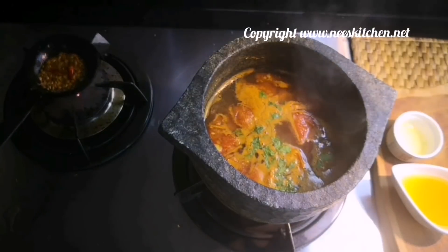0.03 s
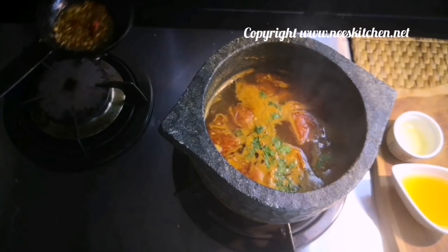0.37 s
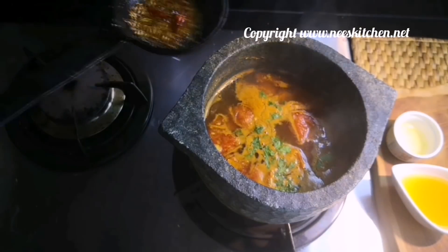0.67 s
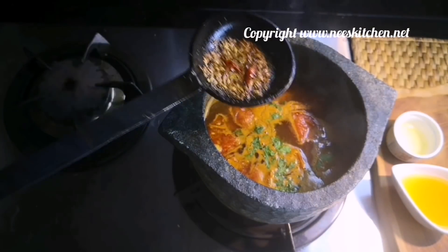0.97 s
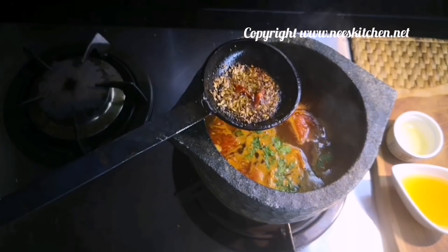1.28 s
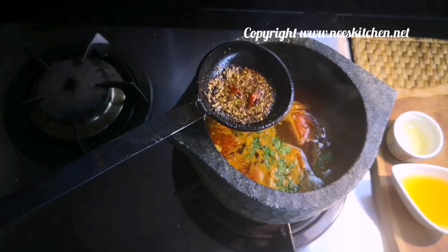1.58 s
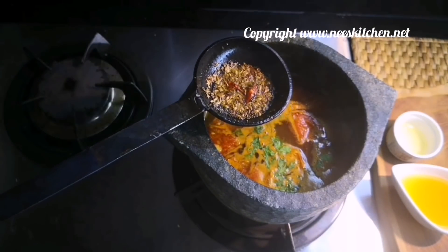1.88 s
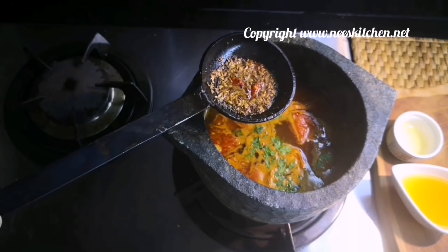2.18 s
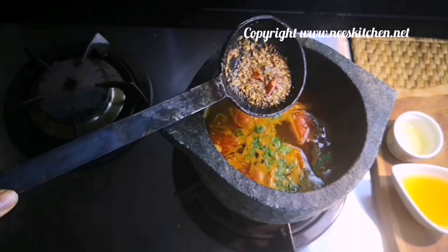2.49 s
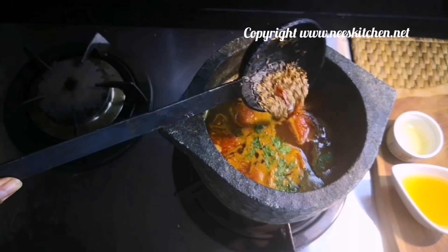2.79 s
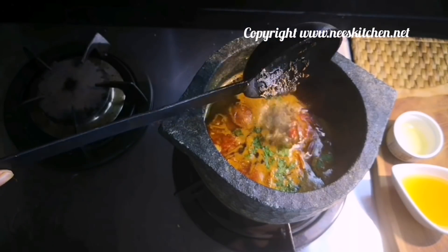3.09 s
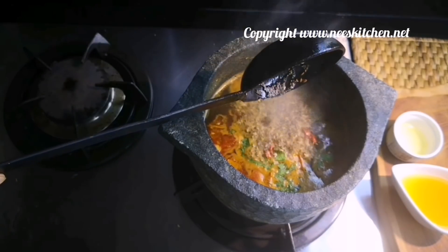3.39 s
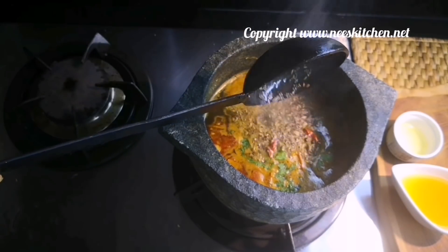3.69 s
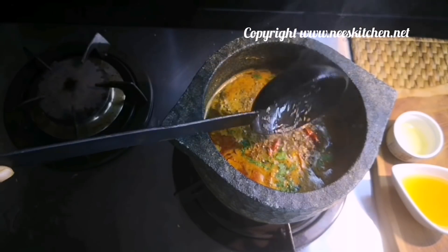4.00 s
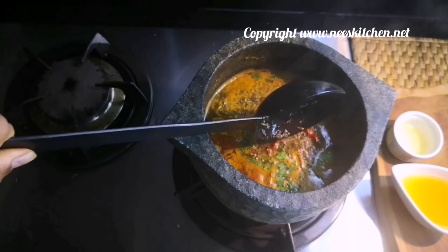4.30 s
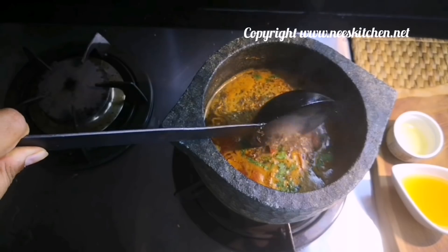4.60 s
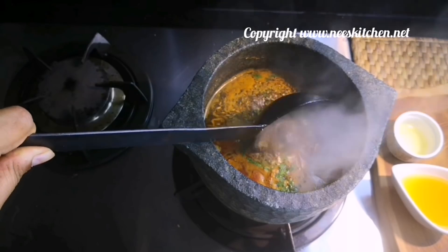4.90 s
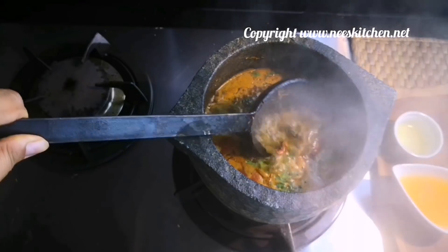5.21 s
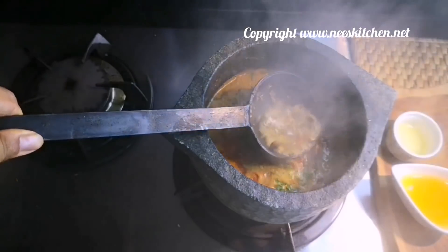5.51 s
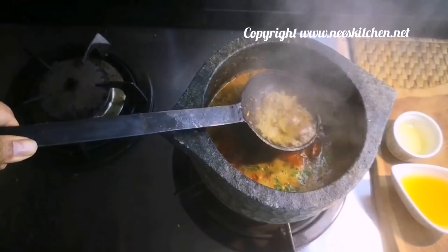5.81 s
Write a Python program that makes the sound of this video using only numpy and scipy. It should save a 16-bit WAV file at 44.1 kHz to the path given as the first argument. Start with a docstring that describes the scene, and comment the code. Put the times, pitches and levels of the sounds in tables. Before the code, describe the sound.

A gas burner rushes softly in a home kitchen while mustard seeds pop and fat spits in a ladle of hot ghee. The ghee is tipped into a pot of broth with a sudden crackling sizzle that dies toward a simmer. Then the hot ladle is dipped in and the sizzle returns louder, seething steadily over low bubbling. The stereo microphones are close to the stove.

```python
"""Mustard seeds pop in an iron ladle of hot ghee over a gas flame's rush and a faint hum: a home kitchen,
a stereo pair of microphones close to the hob. The ladle is carried over a stone pot of broth and tipped;
water flashes to steam in the fat, a sizzle that dies to a simmer. Then the hot iron is dipped in, boils
the broth much harder, and comes up full and seething. The air in pot and ladle colours the tiny bursts,
steam pockets thump underneath, and rising air rumbles on the microphones."""
import sys
import numpy as np
from scipy import signal
from scipy.fft import rfft, irfft
from scipy.io import wavfile

SR = 44100
rng = np.random.default_rng(int(sys.argv[2]) if len(sys.argv) > 2 else 0)


def digitize_waveform(pressure):
    """Quantize a signal to 16-bit integers and store it at the path in sys.argv[1].

    Rows of a 2-D input are taken as channels; values are limited to [-1, 1].
    """
    field = np.atleast_2d(pressure).T
    bounded = np.clip(field, -1, 1)
    quanta = np.round(bounded * 32767).astype(np.int16)
    wavfile.write(sys.argv[1], SR, quanta)


N = 266789
TIME = np.arange(N) / SR
FREQ = np.maximum(np.arange(N // 2 + 1) * SR / N, 1)
POUR_S, DIP_S, LIFT_S = 2.83, 4.36, 5.27  # ghee tipped in, ladle dipped, ladle halfway out
POT_PAN_DB = -1.16  # every pan is left minus right

# Spectrum of the gas flame: f/Hz, level/dB
FLAME_COLOUR = [(41, -19), (70, 0.5), (181, 5.5), (232, -7.5), (381, -4.5), (613, -13.5), (1030, -9),
                (1480, -12.5), (2600, -12.5), (3330, -20.5), (4580, -20), (6420, -24.5), (7190, -18),
                (8610, -36.5), (15500, -33)]
# Lines of the kitchen's hum: f/Hz, level/dB
HUM_LINES = [(96.9, -71.5), (166.9, -70), (285.3, -69), (403.7, -69)]
# Side relative to mid at the microphones, for flame and heaving, then for the sizzle: f/Hz, level/dB
HOB_WIDTH = [(60, -26), (110, -42), (200, -16.5), (380, -1), (700, 6), (1290, -1.5), (2380, 0),
             (4400, -1.5), (8120, 0.5), (15000, 0)]
SIZZLE_WIDTH = [(60, -64), (110, -120), (200, -77), (380, 0), (700, 1.5), (1290, -11.5), (2380, -2.5),
                (4400, -4.5), (8120, 0.5), (15000, 0)]
# Spectrum of the low boiling: f/Hz, level/dB
LOW_BOIL_COLOUR = [(29, -27), (50, 8), (140, -16), (167, -8), (204, 7), (284, -22), (329, -13), (403, -61),
                   (450, -4.5), (580, -20), (990, -120)]
# Low resonances of pot and room: f/Hz, width/Hz, level/dB
POT_ROOM_MODES = [(94, 3.3, 8.5), (137.5, 18.7, 3), (202, 41, -5.5), (334, 17, -7)]
# The broth heaves as the ghee lands and as the ladle is drawn up: t/s, half length/s, gain/dB
BROTH_HEAVES = [(3.08, 0.078, 7), (5.17, 0.11, 4.5)]
# Steam squeezing out of the fat: t/s, f/Hz, level/dB, half length/s, pan/dB
STEAM_WHISTLES = [(2.902, 3600, -27, 0.0043, -3), (3.004, 7100, -29, 0.0057, 7),
                  (3.717, 7460, -30, 0.018, -11), (3.745, 7360, -32, 0.0066, -8),
                  (4.662, 4900, -28, 0.013, 1)]
# Spectrum of a pop's broad snap: f/Hz, level/dB
SNAP_SPECTRUM = [(500, 17), (1000, 0), (1700, 6), (4000, 7.5), (7500, 14), (9500, -0.5), (14500, 3.5)]
# Moisture spitting out of the fat: t/s, level/dB, snap trim/dB, pan/dB
FAT_SPITS = [(0.505, -19, 8, 1.5), (0.549, -38, 12, -4), (0.696, -34, -1, 4), (0.976, -27, -4, -1),
             (1.9, -14.5, -1, -2), (1.947, -22.5, -4, -7), (1.971, -17, 12, 0), (2.174, -20, -7, 0),
             (2.822, -17.5, -36, 0), (3.831, -39, -25, 2), (4.008, -13, 5, -3), (4.163, -15.5, 10, -11),
             (4.904, -19, -31, 7), (5.028, -7.5, -16, 20), (5.146, -10, 19, -1)]
# Mustard seeds bursting: t/s, level/dB, husk ring f/Hz, bowl ring trim/dB, snap trim/dB
SEED_POPS = [(0.127, -41, 2230, -10, -45), (0.43, -27, 2030, -5, -42), (0.864, -37, 2030, -10, -36),
             (1.078, -14, 2780, 2.5, -35), (1.276, -26, 1600, -16, -46), (1.867, -24, 2730, 4, -35),
             (1.963, -10, 3000, -4.5, -29), (2.016, -17, 2960, -5.5, -35), (2.067, -25.5, 2620, 0, -27),
             (2.25, -31.5, 2500, -2, -29), (2.281, -21, 2820, -26, -41), (2.352, -8, 2850, 0.5, -27.5),
             (2.365, -16.5, 2510, -4, -25), (2.401, -11.5, 2760, -8, -27), (2.625, -18, 2900, -12, -27.5),
             (4.003, -17, 2740, -7, -18), (4.16, -18, 2540, -15, -19)]
# Broad spectra of the sizzle, for the pour and for the dip: f/Hz, level/dB
POUR_SPECTRUM = [(180, -46), (300, -24.5), (543, -21), (968, -7), (1330, -7.5), (1840, -5.5), (3130, -15),
                 (3570, -1.5), (4140, -4), (5660, -9.5), (7370, -14), (9450, -28.5), (15500, -25)]
DIP_SPECTRUM = [(180, -48), (300, -16), (543, -22), (708, -4), (863, -4), (1000, 0.5), (1350, -3),
                (1640, 4), (2250, -2), (2650, -2.5), (6150, -4.5), (7250, 4.5), (9450, -14.5),
                (14500, -6.5), (15500, -9)]
# Air resonances of the pot: open, ladle sunk in it, ladle lifted: f/Hz, width/Hz, level/dB
OPEN_POT_MODES = [(744, 43, -5.5), (1007, 66, 0.5), (1656, 66, 0), (1815, 31, 3), (2150, 93, -5),
                  (2830, 300, -6), (3574, 160, 5), (4470, 43, -10), (4840, 80, 1.5), (7380, 520, -4.5)]
SUNK_MODES = [(1013, 41, 2.5), (1640, 310, -14), (2730, 150, -8), (3000, 34, -15), (3230, 56, -3),
              (3940, 64, 0.5), (4640, 340, -1.5), (5400, 130, -5), (7400, 180, -5.5), (8300, 76, -3)]
LIFTED_MODES = [(779, 16, 5.5), (1030, 83, 4), (1660, 64, -21), (1900, 74, -7), (2120, 6.2, 2),
                (2596, 50, 3.5), (3590, 560, -2), (4700, 76, 2.5), (5050, 40, 6), (5800, 29, 4),
                (7780, 330, 0.5)]
# The first gush and last dribbles of ghee flare the sizzle: t/s, half length/s, gain/dB
GHEE_GUSHES = [(2.885, 0.0083, 4.5), (3.73, 0.0099, 2), (4.27, 0.048, 4)]


def undb(db):
    """Decibels to gain."""
    return 10 ** (np.asarray(db) / 20)


def unit(x):
    """Scale to rms 1."""
    return x / np.sqrt(np.mean(x ** 2))


def mid_unit(pair):
    """Scale a stereo pair so that its middle has rms 1."""
    return pair / np.std(pair.mean(axis=0))


def bins(length):
    """Frequencies in Hz of a spectrum of this many samples, floored at 1."""
    return np.maximum(np.fft.rfftfreq(length, 1 / SR), 1)


def shape(points, freq=FREQ):
    """Gain at each frequency of a spectrum given as f/Hz, level/dB."""
    hz, db = np.transpose(points)
    return undb(np.interp(np.log(freq), np.log(hz), db))


def peak(hz, width_hz):
    """Gain of one narrow resonance."""
    return 1 / (1 + ((FREQ - hz) / width_hz) ** 2)


def filtered(x, gain):
    """Apply a gain per frequency."""
    return irfft(rfft(x) * gain, N)


def causal(gain):
    """Impulse response with this gain that starts at once and rings out."""
    cepstrum = irfft(np.log(gain + 1e-9))
    half = len(cepstrum) // 2
    cepstrum[1:half] *= 2
    cepstrum[half + 1:] = 0
    return irfft(np.exp(rfft(cepstrum)))


def panned(db):
    """Left and right gains for a level difference between the microphones."""
    return undb(np.array([db, -db]).reshape(2, -1) / 2)


def spread(pair, width):
    """Two unrelated signals become mid and side, then left and right."""
    side = filtered(pair[1], shape(width))
    return np.array([pair[0] + side, pair[0] - side])


def ramp(middle_s, length_s):
    """Rises from 0 to 1 around a moment."""
    return np.clip((TIME - middle_s) / length_s + .5, 0, 1)


def swells(rows):
    """Sum of Gaussian bumps in dB, each t/s, half length/s, gain/dB."""
    return sum(db * np.exp(-((TIME - s) / half_s) ** 2 / 2) for s, half_s, db in rows)


def walk(per_s):
    """Random wander about zero, gliding to a new value per_s times a second."""
    knots = rng.standard_normal(N // 50)
    return 0.9 * np.interp(TIME * per_s, np.arange(len(knots)), knots)


def bursts(per_s, scatter_db):
    """Bubbles bursting at random: mostly tiny, a few large."""
    size = undb(scatter_db * np.minimum(rng.exponential(size=(2, N)), 3.5))
    bursting = rng.random((2, N)) < per_s / SR
    return unit(bursting * size * rng.choice([-1, 1], (2, N)))


def cavity(colour, modes, bed_db, ring_db, blur=0.018):
    """Gain of a broad bed with the vessel's resonances standing out; the heaving surface blurs them."""
    ring_power = 0
    for hz, width_hz, db in modes:
        blurred_hz = np.hypot(width_hz, blur * hz)
        ring_power += undb(db) ** 2 * width_hz / blurred_hz * peak(hz, blurred_hz) ** 2
    return np.hypot(undb(bed_db) * shape(colour), undb(ring_db) * np.sqrt(ring_power))


def reflections(ripple_db=3, step_hz=70):
    """Echoes from hob and walls comb the spectrum into fine peaks and dips."""
    knots = rng.standard_normal(N // 100)
    ripple = np.interp(FREQ / step_hz, np.arange(len(knots)), knots)
    return undb(ripple_db * ripple * np.minimum(FREQ / 3000, 1))


def kitchen(early_db, late_db, early_s=0.0054, t60_s=0.24):
    """Path to the microphones: direct sound, quick scatter from pot and hob, then the room's tail."""
    t = TIME[:SR // 2]
    early = rng.standard_normal((2, len(t))) * np.exp(-t / early_s)
    late = rng.standard_normal((2, len(t))) * undb(-60 * t / t60_s) * (1 - np.exp(-t / 0.0021))
    late = irfft(rfft(late) * shape([(2500, 0), (12000, -1)], bins(len(t))), len(t))
    response = (undb(early_db) * unit(early) + undb(late_db) * unit(late)) / np.sqrt(len(t))
    response[:, 0] += 1
    return response


def draught(level_db=-59, rise_db_per_s=2, gust_db=3.8):
    """Rising air rumbles on the microphones in gusts, more and more as the pot steams."""
    colour = shape([(5, -37), (18, 4), (35, 5.5), (60, -5.5), (110, -9), (600, -108)])
    rumble = filtered(rng.standard_normal(N), colour)
    return unit(rumble) * undb(level_db + rise_db_per_s * TIME + gust_db * walk(5.6))


def hum(width_hz=6, gain_db=3, sink_db=-9):
    """Narrow resonances stirred by the flame and the air: a faint wavering hum that soon sinks."""
    stir = rng.standard_normal(N)
    lines = sum(undb(db) * unit(filtered(stir, peak(hz, width_hz))) for hz, db in HUM_LINES)
    return lines * undb(gain_db + sink_db * ramp(1.4, length_s=0.26))


def gas_flame(level_db=-55, waver_db=3.8):
    """The burner's rush, slowly wavering in level."""
    rush = filtered(spread(rng.standard_normal((2, N)), HOB_WIDTH), shape(FLAME_COLOUR))
    return mid_unit(rush) * undb(level_db - waver_db * walk(1.52))


def heaving_broth(level_db=-50, iron_db=8.5, build_s=0.44, surge_db=2):
    """Large steam pockets thump the low resonances in uneven surges; harder once the iron goes in."""
    boost_db = iron_db * ramp(DIP_S + build_s / 2, build_s) + swells(BROTH_HEAVES)
    body = cavity(LOW_BOIL_COLOUR, POT_ROOM_MODES, bed_db=-6.5, ring_db=-1)
    thumps = filtered(spread(bursts(per_s=100, scatter_db=2.2), HOB_WIDTH), body)
    surging = mid_unit(thumps * undb(surge_db * walk(11)))
    return ramp(POUR_S, length_s=0.073) * surging * undb(level_db + boost_db)


def steam_whistles(width_hz=170):
    """Steam squeezes out of the fat in narrow hissing tones that swell and vanish."""
    out = 0
    for s, hz, db, half_s, pan_db in STEAM_WHISTLES:
        tone = mid_unit(filtered(rng.standard_normal((2, N)), peak(hz, width_hz)))
        swell = np.exp(-((TIME - s) / half_s) ** 2 / 2)
        out += tone * swell * panned(pan_db) * undb(db)
    return out


def ring(hz, octaves, freq):
    """Gain of one broad ring of a pop, weighted by how the small source radiates."""
    radiated = shape([(800, 6.5), (1250, -16), (1550, 14.5), (7900, 1), (9000, -47)], freq)
    return unit(radiated / (1 + (np.log2(freq / hz) / octaves) ** 2))


def snap(freq, low_hz=1120):
    """Gain of a pop's broad snap; a thing so small radiates no bass."""
    return shape(SNAP_SPECTRUM, freq) / np.sqrt(1 + (low_hz / freq) ** 4)


def pop(s, colour, leak_s=0.0022, tear_s=0.00096, far_echo_db=7.5):
    """A leak of steam, then a sudden burst of the given colour; the kitchen echoes it."""
    lead = SR // 200
    t = TIME[:lead]
    leak = undb(-21) * np.exp(-t[::-1] / leak_s)
    tear = undb(-17) * np.exp(-t / tear_s)
    push = np.concatenate([leak, tear]) * rng.standard_normal(2 * lead)
    push[lead] = 2  # the instant it gives way
    crack = np.convolve(causal(colour), push)
    # farther off, the ladle echoes more, until it is carried over the pot
    echo_db = far_echo_db * (1 - ramp(1, length_s=0.16)[int(s * SR)])
    room = kitchen(early_db=0.5 + echo_db, late_db=-3 + echo_db)
    heard = signal.fftconvolve(crack[None] / np.abs(crack).max(), room, axes=1)
    out = np.zeros((2, N + SR))
    start = int(s * SR) - lead
    out[:, start:start + heard.shape[1]] = heard
    return out[:, :N]


def fat_spits(steam_hz=7350, body_hz=2540, body_db=-14, snap_db=19):
    """Moisture flashes out of the fat: a steam jet's high ring, a weak lower one and a bright snap."""
    freq = bins(1024)
    rings = np.hypot(ring(steam_hz, 0.23, freq), undb(body_db) * ring(body_hz, 0.9, freq))
    out = 0
    for s, db, snap_trim_db, pan_db in FAT_SPITS:
        colour = np.hypot(rings, undb(snap_db + snap_trim_db) * snap(freq))
        out += undb(db) * panned(pan_db) * pop(s, colour)
    return out


def seed_pops(bowl_hz=4520, bowl_db=2, snap_db=20.5, pan_db=-1):
    """Each husk tears open with its own ring, a ring of the ladle's bowl and a slightly dull snap."""
    freq = bins(1024)
    dull_snap = snap(freq) * shape([(8000, 0), (10000, -7.5)], freq)
    out = 0
    for s, db, husk_hz, bowl_trim_db, snap_trim_db in SEED_POPS:
        bowl = undb(bowl_db + bowl_trim_db) * ring(bowl_hz, 0.27, freq)
        rings = np.hypot(ring(husk_hz, 0.57, freq), bowl)
        colour = np.hypot(rings, undb(snap_db + snap_trim_db) * dull_snap)
        out += undb(db) * pop(s, colour)
    return out * panned(pan_db)


def crackle(per_s=170, scatter_db=4.7, decay_s=0.0005):
    """Droplets flashing off: each is a puff of hiss about a millisecond long."""
    kicks = bursts(per_s, scatter_db)[0] ** 2
    power = signal.lfilter([1], [1, -np.exp(-2 / (decay_s * SR))], kicks)
    return unit(np.sqrt(power) * rng.standard_normal((2, N)))


def bubble_pings(count=3000, ring_s=0.009, scatter_db=2.5):
    """Single bubbles that ring for a few milliseconds as they burst."""
    t = TIME[:SR // 25]
    out = np.zeros((2, N + len(t)))
    for when, pitch, size, left, right in rng.random((count, 5)):
        hz = 2500 + 5500 * pitch
        phase = 2 * np.pi * (hz * t + np.array([[left], [right]]))
        gain = undb(-scatter_db * np.log(size + 0.024))
        start = int(when * N)
        out[:, start:start + len(t)] += gain * np.sin(phase) * np.exp(-t / ring_s)
    return unit(out[:, :N])


def boil_db(start_s, attack_s, cool_db_per_s, hold_s=0):
    """Strength of a boil relative to its peak: it builds, holds, then fades as the heat is spent."""
    age = TIME - start_s
    build_db = 20 * np.log10(np.clip(age / attack_s, 0.04, 1))
    return build_db - cool_db_per_s * np.maximum(age - attack_s - hold_s, 0)


def sizzle(start_s, levels_db, pan_db, vessel, crackle_db, ping_db, sputter_db, mist_db, mist_loss):
    """Water flashing to steam in hot fat: larger bubbles below, fizz in the middle, fine spray on top."""
    bubbling_db, fizz_db, spray_db = levels_db
    calm_db = np.minimum(fizz_db.max() - fizz_db, 24)
    # the weaker the boil, the more its crackle stands out
    crackle_gain, ping_gain = undb(crackle_db + 0.42 * calm_db), undb(ping_db)
    boil = bursts(per_s=12000, scatter_db=1.56) + crackle_gain * crackle() + ping_gain * bubble_pings()
    boil /= np.sqrt(1 + crackle_gain ** 2 + ping_gain ** 2)
    boil = filtered(spread(boil, SIZZLE_WIDTH), vessel * reflections())
    below_fizz, below_spray, below_mist = (1 / (1 + (FREQ / hz) ** 12) for hz in (2400, 6200, 9500))
    # the finest mist needs the fiercest boil
    boil += filtered(boil, 1 - below_mist) * (undb(mist_db - mist_loss * calm_db) - 1)
    shares = below_fizz, below_spray - below_fizz, 1 - below_spray
    bubbling, fizz, spray = (mid_unit(filtered(boil, np.sqrt(share))) for share in shares)
    spurts_db = sputter_db * walk(110)  # steam escapes in quick irregular spurts
    bubbling *= undb(bubbling_db + 0.18 * walk(31))
    fizz *= undb(fizz_db + 0.5 * spurts_db)
    spray *= undb(spray_db + spurts_db + 0.5 * walk(35))
    return ramp(start_s, length_s=0.0026) * panned(pan_db) * (bubbling + fizz + spray)


def poured_ghee(simmer_db=-24.5):
    """Ghee flashes on the broth in the open pot and cools to a simmer; the spray holds on longer."""
    pot = cavity(POUR_SPECTRUM, OPEN_POT_MODES, bed_db=-2, ring_db=-2.5, blur=0.015)
    body_db = boil_db(POUR_S, attack_s=0.26, cool_db_per_s=18.5)
    top_db = boil_db(POUR_S, attack_s=0.27, cool_db_per_s=21, hold_s=0.17)
    body_db, top_db = (20 * np.log10(np.hypot(undb(db), undb(simmer_db))) + swells(GHEE_GUSHES)
                       for db in (body_db, top_db))
    levels_db = body_db - 24.5, body_db - 25.5, top_db - 27.5
    pan_db = POT_PAN_DB + swells([(3.58, 0.082, -6.5)])  # swings right as the ladle is emptied
    return sizzle(POUR_S, levels_db, pan_db, pot, crackle_db=-13, ping_db=-12.5,
                  sputter_db=1.5, mist_db=5.5, mist_loss=0.074)


def dipped_ladle(cool_db_per_s=0.2, sunk_mist_db=1, lifted_mist_db=4.5):
    """The iron boils the broth, spray first; lifted out full, it rings differently and mists more."""
    sunk = cavity(DIP_SPECTRUM, SUNK_MODES, bed_db=-3.5, ring_db=-1)
    lifted = cavity(DIP_SPECTRUM, LIFTED_MODES, bed_db=0, ring_db=1.5)
    lift = ramp(LIFT_S, length_s=0.41)
    body_db = boil_db(DIP_S, attack_s=0.22, cool_db_per_s=cool_db_per_s)
    top_db = boil_db(DIP_S, attack_s=0.15, cool_db_per_s=cool_db_per_s)
    top_db += swells([(5.5, 0.13, -5)])  # the spray drops as the ladle breaks the surface
    levels_db = body_db - 26 - 2 * lift, body_db - 26 + 1.5 * lift, top_db - 26.5 - 1.5 * lift
    under, above = (sizzle(DIP_S, levels_db, POT_PAN_DB, vessel, crackle_db=-12, ping_db=-12,
                           sputter_db=1.9, mist_db=mist_db, mist_loss=0.021)
                    for vessel, mist_db in ((sunk, sunk_mist_db), (lifted, lifted_mist_db)))
    return np.cos(np.pi / 2 * lift) * under + np.sin(np.pi / 2 * lift) * above


def scene():
    """Everything that reaches the microphones at the hob."""
    background = gas_flame() + hum() + draught()
    pops = seed_pops() + fat_spits()
    pot = poured_ghee() + steam_whistles() + dipped_ladle() + heaving_broth()
    return background + pops + pot


def record(dry, top_hz=15400):
    """The microphone ports resonate and ripple the treble; the recorder cuts the top."""
    ports = shape([(6300, -1), (7900, 2.5), (8400, -3.5), (9100, 0.5), (9900, -3.5), (10600, -0.5),
                   (12500, -4)])
    heard = signal.lfilter(causal(ports)[:256], 1, dry)
    return signal.sosfilt(signal.ellip(10, .2, 90, top_hz, fs=SR, output="sos"), heard)


dry = scene()
out = record(dry)
digitize_waveform(out)
```